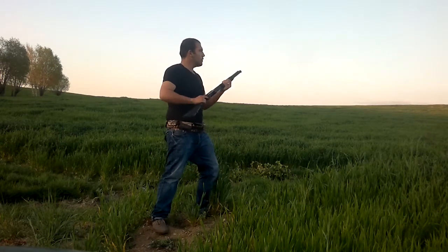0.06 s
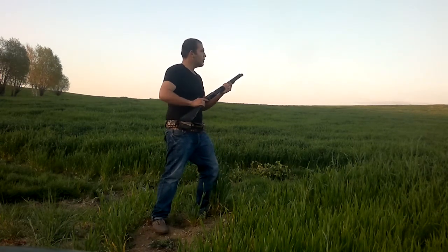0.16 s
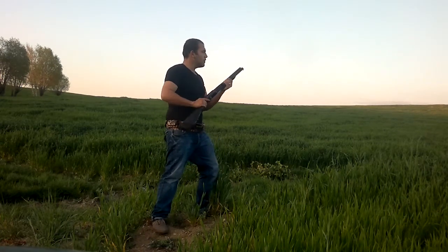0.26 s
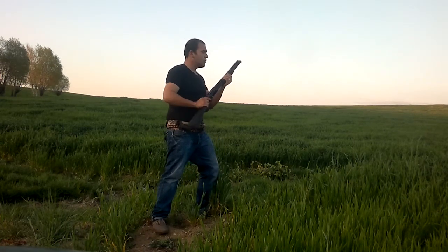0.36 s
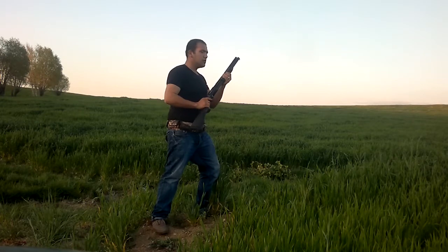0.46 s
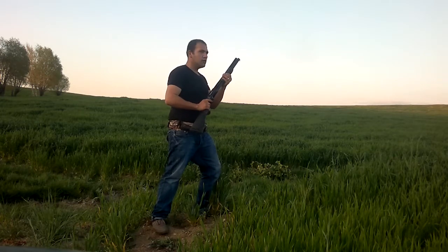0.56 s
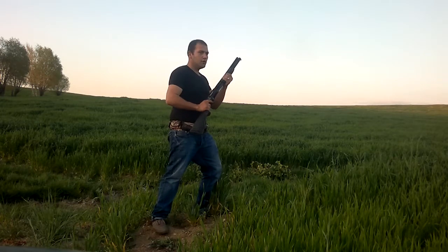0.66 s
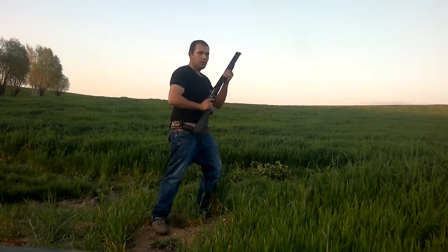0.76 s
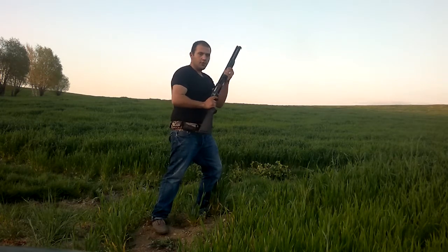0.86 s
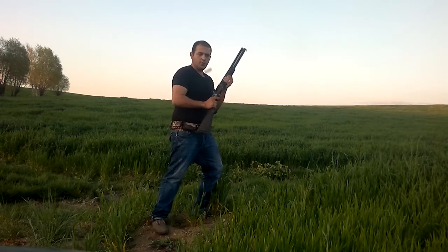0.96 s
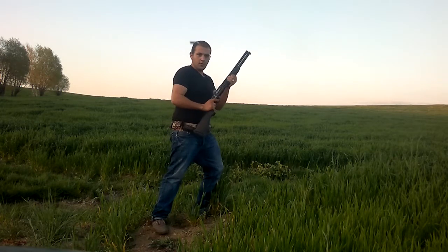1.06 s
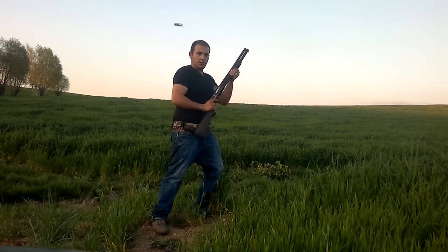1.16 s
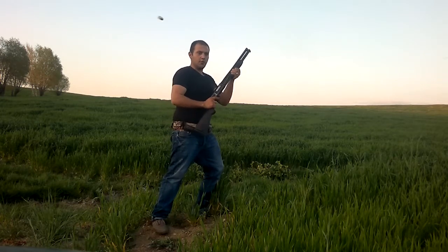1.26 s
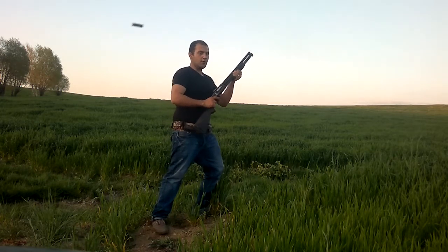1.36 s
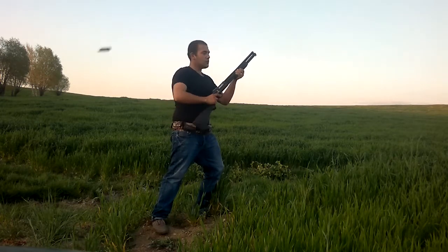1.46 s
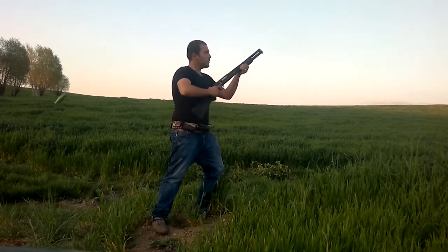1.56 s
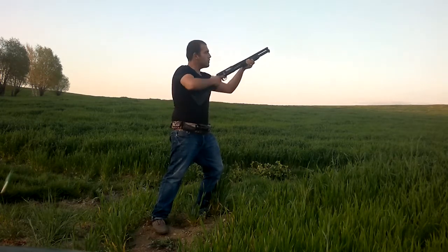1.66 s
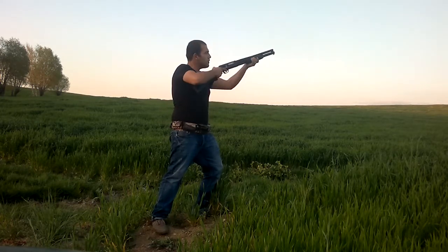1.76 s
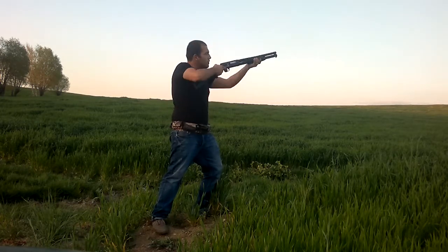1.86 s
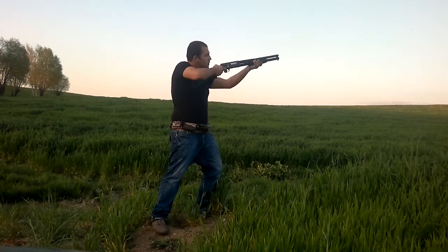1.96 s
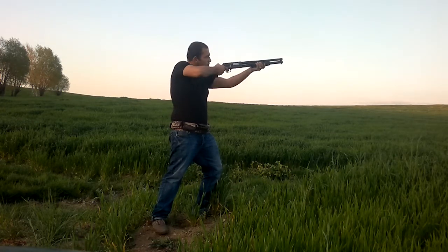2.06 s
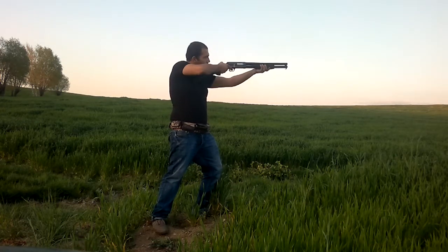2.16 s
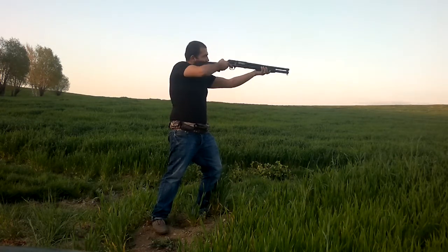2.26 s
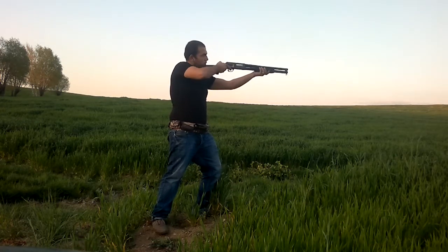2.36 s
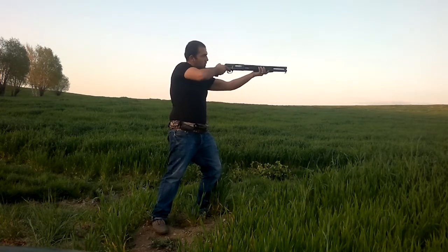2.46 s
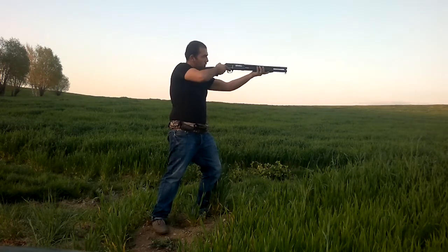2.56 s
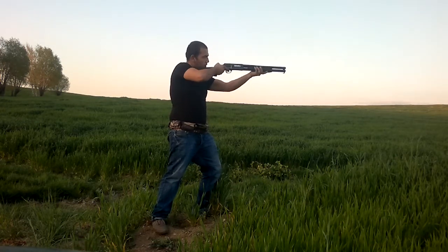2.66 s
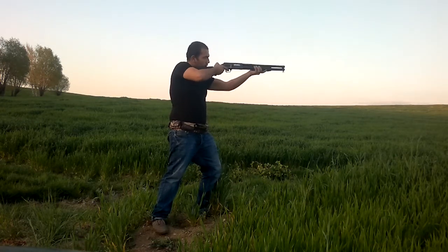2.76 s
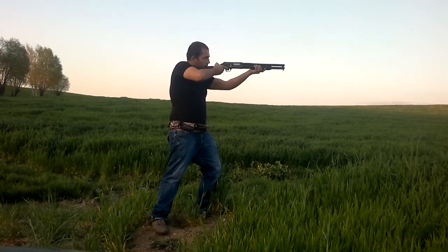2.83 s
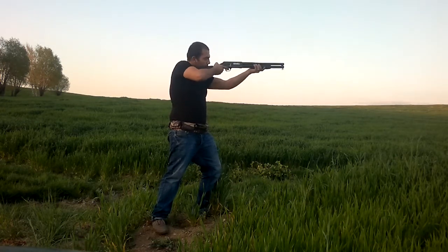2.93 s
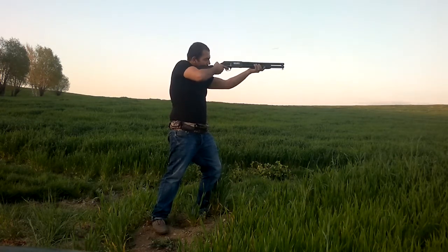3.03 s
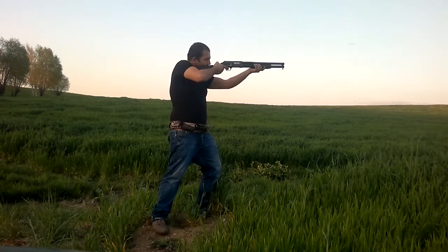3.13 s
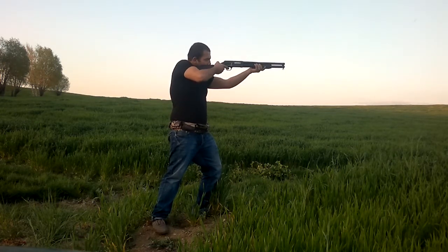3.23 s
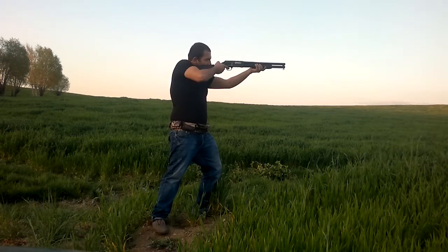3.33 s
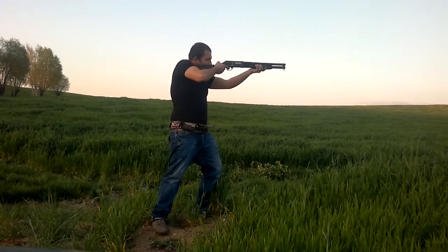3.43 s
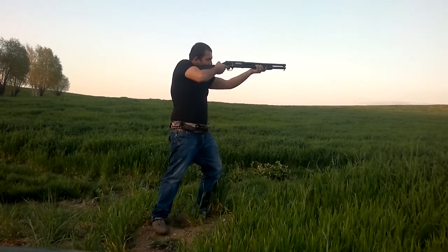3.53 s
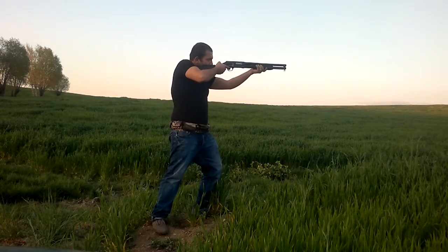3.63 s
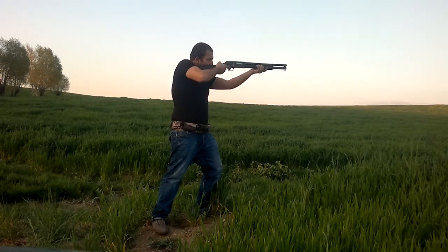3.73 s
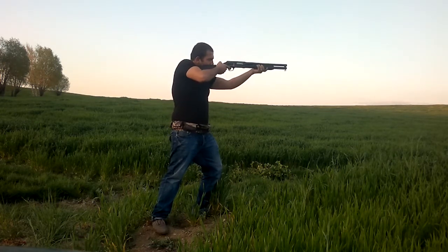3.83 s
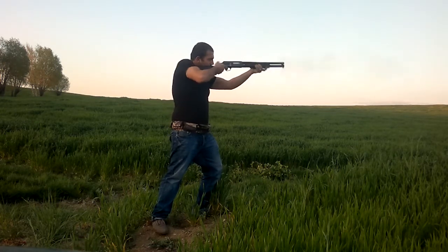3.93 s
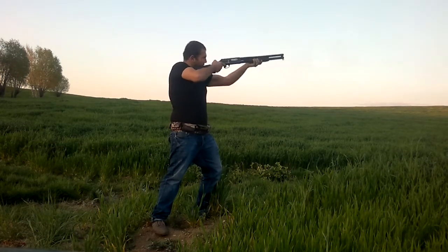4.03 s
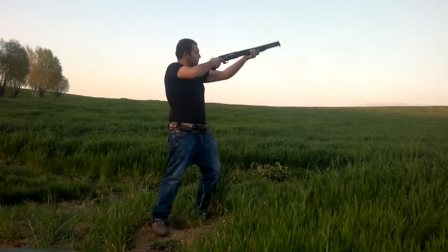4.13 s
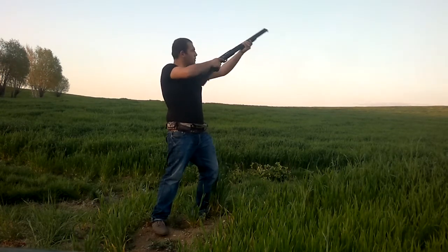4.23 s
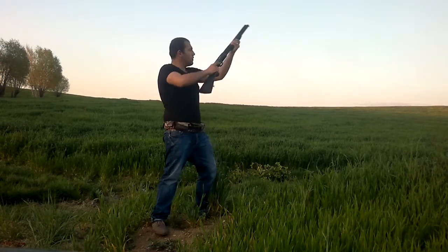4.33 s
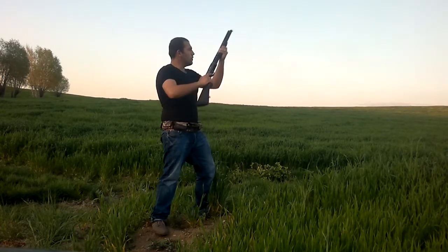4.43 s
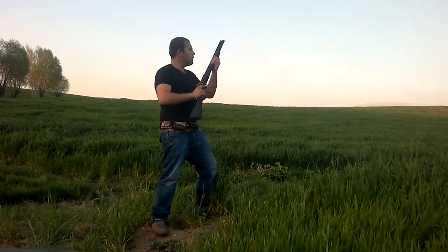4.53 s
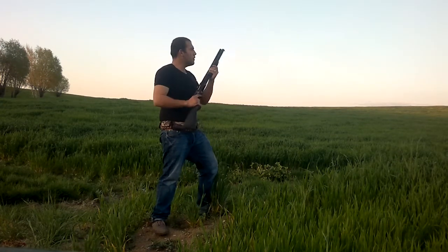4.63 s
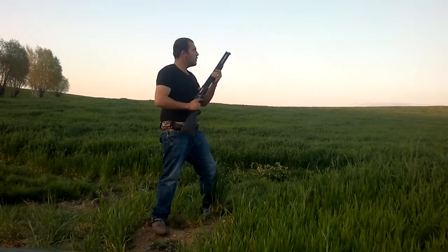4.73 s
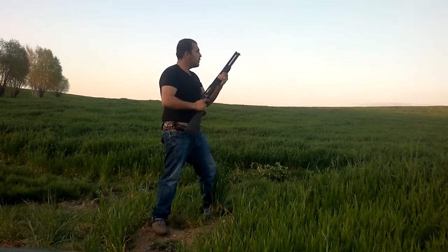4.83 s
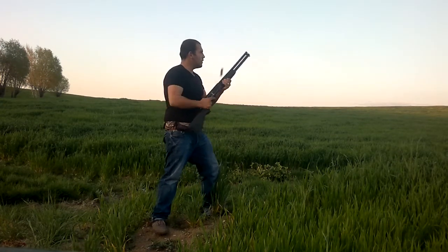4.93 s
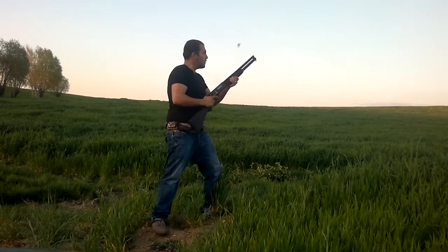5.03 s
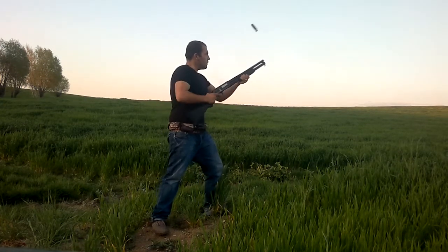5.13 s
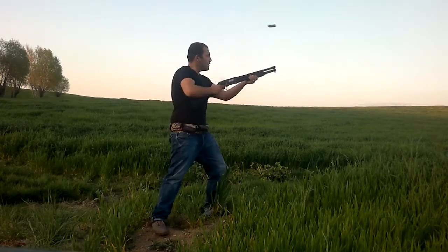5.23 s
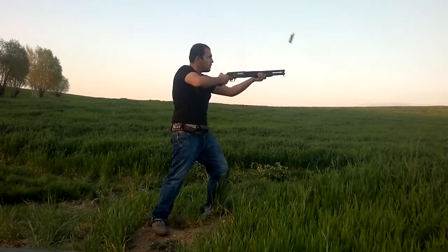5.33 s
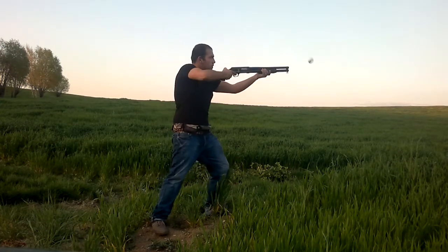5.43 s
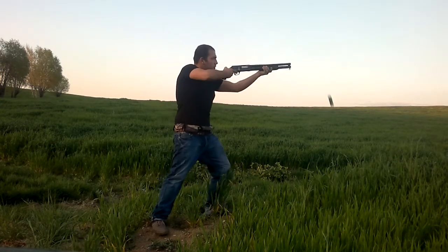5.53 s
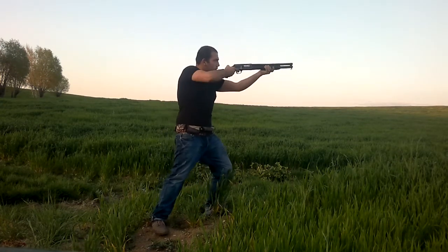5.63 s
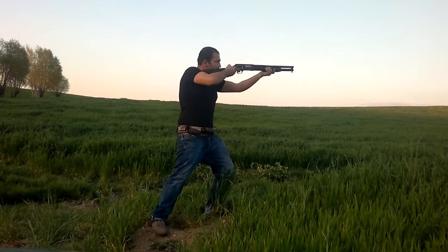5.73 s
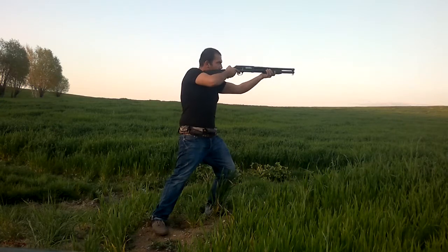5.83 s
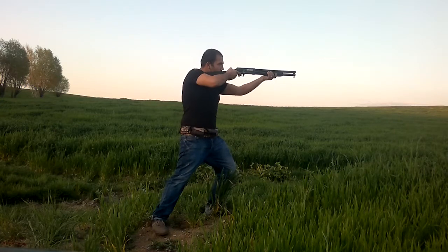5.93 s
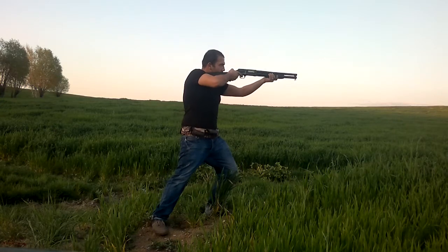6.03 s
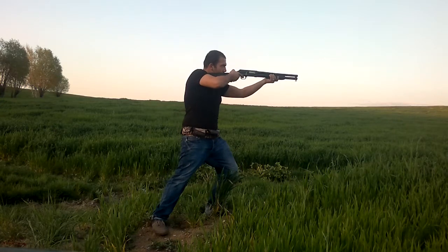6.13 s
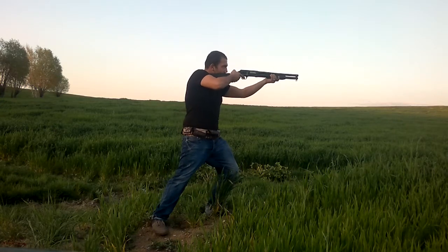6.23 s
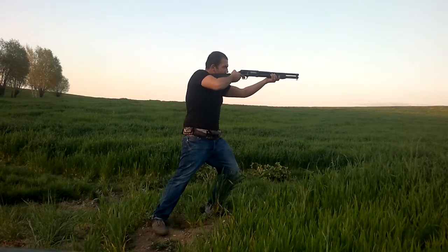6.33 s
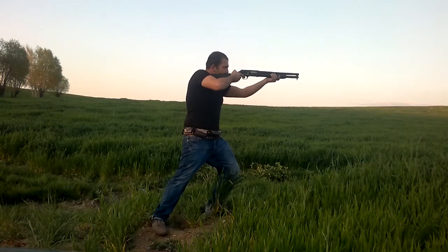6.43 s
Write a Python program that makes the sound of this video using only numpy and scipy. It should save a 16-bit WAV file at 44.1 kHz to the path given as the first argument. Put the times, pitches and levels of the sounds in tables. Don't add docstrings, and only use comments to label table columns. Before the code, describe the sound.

Sharp metallic pump racking, a shell dropping, one distorted shotgun blast with a long outdoor echo, and a second clack-clack, over wind and faint hiss.

```python
import sys
import numpy as np
from scipy import signal
from scipy.fft import rfft, irfft
from scipy.io import wavfile
from scipy.ndimage import uniform_filter1d

SR = 44100
rng = np.random.default_rng(int(sys.argv[2]) if len(sys.argv) > 2 else 0)


def transcribe(u):
    v = np.clip(np.atleast_2d(u).T, -1, 1)
    q = np.round(v * 32767).astype(np.int16)
    wavfile.write(sys.argv[1], SR, q)


def attenuation_scalar(level_db):
    decades = np.asarray(level_db, float) / 20
    return 10 ** decades


N = 286209
T = np.arange(N) / SR

SHOT_S, EARLIER_SHOT_S = 3.9315, -.8

# start_s, length_s, first_hz, middle_hz, last_hz
BLAST_WHOOPS = [
    (3.9315, .0085, 1000, 1500, 2300),
    (3.94, .0122, 1350, 1150, 650),
    (3.9545, .008, 330, 230, 200),
    (3.9625, .017, 460, 420, 270),
]
BLAST_DB = 3
# start_s, first_cycle_s, level_db, dying_s
MEMBRANE_SWINGS = [
    (3.951, .016, -4, 0.0095),
    (3.979, .027, -2.5, 0.033),
]

# centre_hz, width_hz, near_grass_db, far_trees_db, far_t60_s
ROLL_BANDS = [(70, 180, -30, -52.5, 1.1), (147, 48, -8.5, -40, 1.4), (200, 120, -13, -36, .9),
              (530, 270, -13, -51, 1.2), (1010, 230, -8, -39.5, 1.7), (1560, 180, -22, -51, 1.3),
              (2380, 730, -12, -45, 2.52), (3420, 970, -24, -44.5, 1.1), (5200, 480, -42, -50, 1.1),
              (7100, 2200, -27.5, -43, 0.98), (9500, 3000, -21, -46.5, 1.4), (12060, 1200, -28, -46, 0.45)]
GRASS_T60_S, GRASS_T60_PER_KHZ = .22, 0.013
TREES_S, TREES_DB, TREES_T60_S, TREES_HZ = 0.277, -7, 1, 2200
PINNED_S, PINNED_DB = 0.044, -5.5

# start_s, peak_db, bolt_share_db, length_s
SLAMS = [(.908, -5.5, -3.5, .0043), (0.9142, 0.5, -9, 0.004), (0.917, -11, -7, 0.003),
         (.923, -18, -11, 0.006), (0.956, -16.5, -13.5, 0.0081), (1.104, -14.5, -2, 0.0028),
         (1.1075, -6, -.5, 0.0055), (1.123, -27, -5.5, 0.0059), (4.871, -9, -10, .003),
         (4.876, -6, -4.5, 0.0036), (4.884, -23.5, -7.5, .004), (4.9142, -21.5, -13, 0.0071),
         (5.068, -25.5, -8.5, 0.0086), (5.076, -25, -3, 0.0059), (5.081, -12, -10.5, .0058)]
SLAM_RAILS_DB, RAILS_PER_BOLT = 1, .3
SLAM_LATCH_DB, SLAM_RISE_S = -6.5, 0.00047
# start_s, peak_db, rails_share_db
RATTLES = [(0.856, -28.5, -16), (.866, -33.5, -11.5), (.875, -28, -7.5), (0.84, -54.5, 4), (.89, -22.5, 0),
           (0.897, -24, -4.5), (0.901, -24.5, -11.5), (0.967, -20.5, -9.5), (0.984, -24.5, 4),
           (1.012, -27.5, 6), (1.019, -32.5, -0.1), (1.037, -28.5, 4), (1.05, -40, 6), (1.0962, -21.5, 3),
           (1.097, -17.5, 3.5), (4.853, -42.5, -0.5), (4.935, -42, 17.5), (4.979, -31.5, -5),
           (5.018, -38, -1), (5.045, -38, -14)]
RATTLE_RECEIVER_DB, RATTLE_BOLT_DB = -6.5, -10
RATTLE_S, RATTLE_RISE_S = 0.0042, 0.0022
# time_s, level_db
SCRAPES = [
    [(.85, -79.5), (.86, -59), (.9, -33.5), (.95, -34.5), (.99, -40), (1.04, -40), (1.09, -38.5),
     (1.13, -51)],
    [(4.845, -59), (4.86, -32.5), (4.9, -43.5), (4.95, -48.5), (5.05, -50.5), (5.065, -56)],
]
# centre_hz, width_hz, level_db
RECEIVER_MODES = [(480, 160, -9), (1026, 740, 1.5), (1407, 280, 3), (1694, 90, 4.5), (2300, 400, -37.5)]
# centre_hz, width_hz, level_db
BOLT_MODES = [(3260, 350, 5.5), (3720, 580, 5.5), (4130, 770, -3.5), (4995, 190, -8.5)]
# centre_hz, width_hz, level_db
RAIL_MODES = [(6130, 1400, -9), (7110, 1500, -0.5), (8443, 680, 2), (9820, 900, -4.5), (10864, 1100, 4.5),
              (11070, 550, -5.5), (13440, 1500, -13)]
# centre_hz, width_hz, level_db
LATCH_MODES = [(1850, 280, 3.5), (1400, 474, -6.5), (2290, 380, -8)]

# start_s, level_db, tube_ring_db
SHELL_BOUNCES = [(1.8073, -23, -1.5), (1.821, -28.5, -16), (1.868, -35, -29), (1.94, -46, -26),
                 (1.998, -43, -27), (2.464, -43, -32), (2.127, -39.5, -6), (2.57, -56, -20),
                 (2.624, -46, -22), (5.8057, -35, 5.5), (5.825, -47, 5.5)]
# pitch_hz, level_db, t60_s
SHELL_MODES = [(1252, 5.5, 0.037), (1450, -34, .02), (2640, -19, 0.028), (3100, -21, 0.009),
               (3660, -18, 0.018), (10440, -32, 0.016)]

# start_s, peak_db, pitch_hz
KNOCKS = [(.145, -36.5, 634), (1.1, -36.5, 562), (2.125, -43.5, 972), (3.324, -44.5, 1020),
          (3.06, -45, 833), (3.347, -43, 890), (3.589, -47.5, 544), (3.845, -40, 879), (5.182, -52.5, 1133),
          (5.221, -40.5, 533), (5.271, -53, 1150), (5.885, -44, 302), (6.256, -66, 900),
          (6.313, -42.5, 822), (6.315, -42, 230), (1.375, -42.5, 555), (6.456, -42.5, 1066)]
KNOCK_T60_S, KNOCK_PUFF_DB = 0.07, -16.5
# start_s, peak_db, pitch_hz
ECHOES = [(.009, -45.5, 1130), (.215, -42.5, 600), (.274, -48, 680), (4.151, -45, 500), (4.18, -37.5, 480),
          (4.185, -32.5, 1110), (4.214, -31, 1470), (4.237, -29.5, 1064), (4.296, -34.5, 953),
          (4.352, -40, 1090), (4.545, -31.5, 1037), (4.596, -40.5, 880)]
ECHO_T60_S, ECHO_PUFF_DB = 0.038, -5
# start_s, peak_db, pitch_hz, t60_s, puff_db
HAMMER = (3.9195, -38, 1200, .03, -4)

# time_s, at_camera_db, over_grass_db
GUSTS = [(0, -60.5, -51.5), (.15, -59.5, -49.5), (.5, -56, -59), (.85, -53, -58), (1.37, -40, -56),
         (1.75, -49, -54), (2.24, -49, -52), (2.56, -41.5, -50), (2.75, -43.5, -53), (3.13, -45, -51),
         (3.6, -62, -53), (4.05, -48.5, -49.5), (4.63, -65.5, -51), (5.22, -69, -58), (5.5, -63.5, -60.5),
         (5.75, -67.5, -55), (6.1, -64.5, -51), (6.49, -54, -53)]
# pitch_hz, density_db (per Hz)
BUFFET_COLOUR = [(20, -23), (50, -7), (78, -5.5), (98, -0.5), (120, -10), (160, -18.5), (250, -42.5)]
# pitch_hz, density_db (per Hz)
FLUTTER_COLOUR = [(110, -22), (160, -1), (230, -1), (310, 0), (400, -10), (550, -28.5)]
FLUTTER_DB = -57.5
FLUTTER_FROM_PORT, FLUTTER_FROM_GRASS = .5, 0.39
FLUTTER_FROM_GAIN = 0.56
# pitch_hz, density_db (per Hz)
GRASS_COLOUR = [(300, -29), (450, -1.5), (700, 1.5), (1000, 3), (1250, 0.5), (1650, -6.5), (2550, -14),
                (2900, -29)]
GRASS_PATCHES_HZ = (450, 700, 1050, 1550, 2300)
# pitch_hz, density_db (per Hz)
HISS_COLOUR = [(2000, -23.5), (3000, 1), (5000, 2), (10000, -2), (15500, -7.5)]
# time_s, level_db
HISS_GAIN = [(0, -90.5), (.7, -86), (1.3, -78.5), (3.9, -79.5), (4.3, -92), (5.3, -86.5), (5.9, -80),
             (6.49, -78)]
# pitch_hz, level_db
AUDIBLE_LIMIT = [(2600, -130), (3200, -97), (5000, -94), (8000, -97.5), (11000, -91.5), (13000, -88),
                 (14000, -66), (16000, -50)]


def blast(wobble=0.28, grit_db=-12, ragged_db=-9, slowing=0.4):
    out = np.zeros(N)
    for s, length, *hz in BLAST_WHOOPS:
        u = np.arange(int(length * SR)) / (length * SR)
        pitch = np.interp(u, [0, .5, 1], hz) * np.exp(wobble * walk(1.2 * hz[1], count=len(u)))
        edge = np.minimum(1, 25 * np.minimum(u, 1 - u))
        add(out, s, -attenuation_scalar(BLAST_DB) * edge * np.sin(2 * np.pi * np.cumsum(pitch) / SR))
    spray = fade(SHOT_S - .002, .22, .003)
    grit = attenuation_scalar(grit_db) * steep(rng.standard_normal(N), 9500, 6000)
    ragged = attenuation_scalar(ragged_db) * 2 * steep(rng.standard_normal(N), 1900, 1800)
    out = 0.73 * np.tanh(out + spray * (grit + ragged))
    for s, cycle, db, dying in MEMBRANE_SWINGS:
        u = np.maximum(T - s, 0)
        shape = (1 - np.exp(-u / 0.00058)) * np.exp(-(u / dying) ** 2)
        out = out - attenuation_scalar(db) * shape * np.sin(2 * np.pi * (u / cycle) ** slowing)
    return out


def roll(patchy_db=1.0):
    out = 0
    for hz, width, near_db, far_db, far_t60 in ROLL_BANDS:
        near_t60 = GRASS_T60_S + GRASS_T60_PER_KHZ * hz / 1000
        band = steep(rng.standard_normal(N), hz, width)
        trees_db = far_db + TREES_DB - 6 * np.log2(hz / TREES_HZ) ** 2
        shape = attenuation_scalar(trees_db) * fade(SHOT_S + TREES_S, TREES_T60_S, 0.0089)
        for s in (SHOT_S, EARLIER_SHOT_S):
            shape = shape + attenuation_scalar(near_db) * fade(s, near_t60, 0.00037)
            shape = shape + attenuation_scalar(far_db) * fade(s, far_t60, 0.033)
        out = out + band / np.std(band) * shape * attenuation_scalar(patchy_db * walk(27))
    pinned_db = np.interp(T - SHOT_S, [0, .001, PINNED_S, PINNED_S + .008], [0, PINNED_DB, PINNED_DB, 0])
    return out * attenuation_scalar(pinned_db)


def action_forces():
    force, u = np.zeros((4, N)), np.arange(2000) / SR
    hits = []
    for s, db, bolt_db, length in SLAMS:
        shares_db = (0, bolt_db, SLAM_RAILS_DB + RAILS_PER_BOLT * bolt_db, SLAM_LATCH_DB)
        hits.append((s, db, shares_db, length, SLAM_RISE_S))
    for s, db, rails_db in RATTLES:
        shares_db = (RATTLE_RECEIVER_DB, RATTLE_BOLT_DB, rails_db, 0)
        hits.append((s, db, shares_db, RATTLE_S, RATTLE_RISE_S))
    for s, db, shares_db, length, rise in hits:
        push = (1 - np.exp(-u / rise)) * np.exp(-(u / length) ** 1.5)
        for row, share_db in zip(force, shares_db):
            add(row, s, attenuation_scalar(db + share_db) * push)
    scrape_shares_db = np.array([[0], [-6], [-2.4], [-8]])
    for span in SCRAPES:
        rub_db = np.interp(T, *np.transpose(span), left=-120, right=-120)
        force = force + attenuation_scalar(rub_db + 2 * walk(200)) * attenuation_scalar(scrape_shares_db)
    return force


def action(grit_db=4, crack_db=-8, near_db=-16, near_t60=0.11, field_db=-28, field_s=0.13):
    force = action_forces()
    out = 0
    for row, modes in zip(force, (RECEIVER_MODES, BOLT_MODES, RAIL_MODES, LATCH_MODES)):
        grit = rng.standard_normal(N) * attenuation_scalar(grit_db * rng.standard_normal(N))
        norm = np.std(sum(attenuation_scalar(db) * steep(grit, hz, w) for hz, w, db in modes))
        out = out + sum(attenuation_scalar(db) * steep(row * grit, hz, w) for hz, w, db in modes) / norm
    crack = force[2] * ring(rng.standard_normal(N), 11000, 14000)
    out = out + attenuation_scalar(crack_db) * crack
    u = T[:16000]
    field = steep(rng.standard_normal(16000), 8500, 6000) * np.exp(-u / 0.055 - (u / field_s) ** 4)
    near = steep(rng.standard_normal(8000), 5000, 9000) * fade(0.0024, near_t60, .002)[:8000]
    out = out + attenuation_scalar(near_db) * signal.fftconvolve(out, near)[:N] / 20
    return 0.41 * out + attenuation_scalar(field_db) * signal.fftconvolve(crack, field)[:N] / 20


def shells(crack_db=-22):
    out, u = np.zeros(N), np.arange(4000) / SR
    for s, db, tube_db in SHELL_BOUNCES:
        contact = np.exp(-u / 0.00061) + 0.18 * np.exp(-u / 0.026)
        y = attenuation_scalar(crack_db) * contact * ring(rng.standard_normal(len(u)), 7100, 12000)
        for hz, mode_db, t60 in SHELL_MODES:
            size = attenuation_scalar(mode_db + tube_db * (hz < 3000))
            shape = (1 - np.exp(-u / 0.00046)) * np.exp(-np.log(1000) * u / t60)
            y = y + size * shape * np.sin(2 * np.pi * hz * u)
        add(out, s, attenuation_scalar(db) * y)
    return out


def knocks(rise=0.0024, rough=0.45):
    out, u = np.zeros(N), np.arange(6000) / SR
    rows = [(*e, ECHO_T60_S, ECHO_PUFF_DB) for e in ECHOES]
    rows += [(*k, KNOCK_T60_S, KNOCK_PUFF_DB) for k in KNOCKS]
    for s, db, hz, t60, puff_db in [*rows, HAMMER]:
        shape = (1 - np.exp(-u / rise)) * np.exp(-np.log(1000) * u / t60)
        drift = rough * np.cumsum(walk(hz, count=len(u))) * 2 * hz / SR
        tone = steep(shape * np.sin(2 * np.pi * hz * u + drift), hz, .8 * hz)
        puff = steep(steep(shape * rng.standard_normal(len(u)), 1500, 2000), 1500, 2000)
        add(out, s, attenuation_scalar(db) * (tone / shape.max() + attenuation_scalar(puff_db) * puff / np.abs(puff).max()))
    return out


def wind(throb_db=3, eddy_db=3, patch_db=3.5, sway_db=0.5, flicker_db=2.5):
    s, *gusts = np.transpose(GUSTS)
    here, there = (np.interp(T, s, db) for db in gusts)
    flutter_db = FLUTTER_DB + FLUTTER_FROM_PORT * (here + 50) + FLUTTER_FROM_GRASS * (there + 50)
    flutter_db = flutter_db + FLUTTER_FROM_GAIN * (hiss_level() + 79)
    eddies = walk(9)
    port = colour(BUFFET_COLOUR) * attenuation_scalar(here + eddy_db * eddies + throb_db * walk(30))
    flutter = colour(FLUTTER_COLOUR) * attenuation_scalar(flutter_db + 1.5 * eddies + throb_db * walk(50))
    rustle = colour(GRASS_COLOUR)
    grass = sum(steep(rustle, hz, 0.61 * hz) * attenuation_scalar(patch_db * walk(18)) for hz in GRASS_PATCHES_HZ)
    grass = grass / np.std(grass) * attenuation_scalar(there + sway_db * walk(14) + flicker_db * walk(60))
    return port + flutter + grass


def hiss_level():
    return np.interp(T, *np.transpose(HISS_GAIN))


def hiss():
    return colour(HISS_COLOUR) * attenuation_scalar(hiss_level())


def colour(points):
    hz, db = np.transpose(points)
    f = np.log(np.maximum(np.fft.rfftfreq(N, 1 / SR), 1))
    shape = attenuation_scalar(np.interp(f, np.log(hz), db, left=-99, right=-99))
    y = irfft(rfft(rng.standard_normal(N)) * shape, N)
    return y / np.std(y)


def ring(x, hz, width):
    return signal.lfilter(*signal.iirpeak(min(hz, .45 * SR), max(hz / width, .3), SR), x)


def steep(x, hz, width):
    return ring(ring(x, hz, 1.5 * width), hz, 1.5 * width)


def fade(start, t60, rise=0.0007):
    u = np.maximum(T - start, 0)
    return (1 - np.exp(-u / rise)) * np.exp(-np.log(1000) * u / t60)


def walk(rate, count=N):
    k = max(int(SR / rate), 1)
    held = np.repeat(rng.standard_normal(count // k + 1), k)
    return 1.2 * uniform_filter1d(uniform_filter1d(held, k), k)[:count]


def add(out, start, x):
    i = int(start * SR)
    out[i:i + len(x)] += x[:N - i]


def drop_quiet(x, knee_db=1.5):
    f, _, z = signal.stft(x, SR, nperseg=512)
    power = uniform_filter1d(uniform_filter1d(np.abs(z) ** 2, size=8, axis=0), size=3, axis=1)
    db = 10 * np.log10(power + 1e-20)
    limit = np.interp(f, *np.transpose(AUDIBLE_LIMIT))[:, None]
    gate = .5 + .5 * np.tanh((db - limit) / knee_db)
    return signal.istft(z * gate, SR, nperseg=512)[1][:N]


def scene():
    air = wind()
    noise = hiss()
    sources = blast() + roll() + knocks() + action() + shells() + air
    return (drop_quiet(sources) + noise)[None]


def roll_off(x):
    return signal.sosfilt(signal.butter(12, 15730, fs=SR, output="sos"), x)


def record(dry):
    dry = dry - .5 * ring(dry, 5200, 700)
    rounded = 1.116 * np.tanh(dry / 1.023 + .2 * dry ** 3)
    cut = signal.sosfilt(signal.ellip(8, .3, 60, 15500, fs=SR, output="sos"), rounded)
    return roll_off(np.clip(cut, -1, 1))


dry = scene()
out = record(dry)
transcribe(out)
```